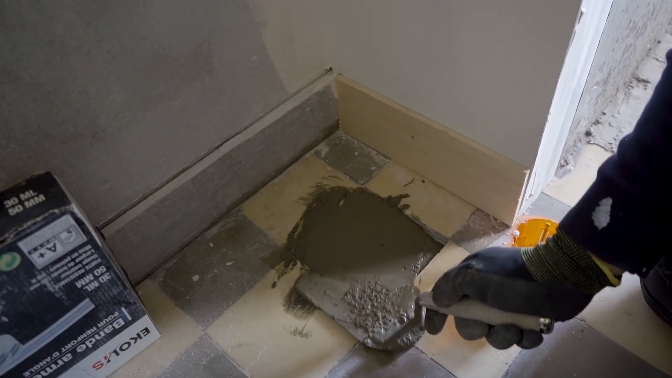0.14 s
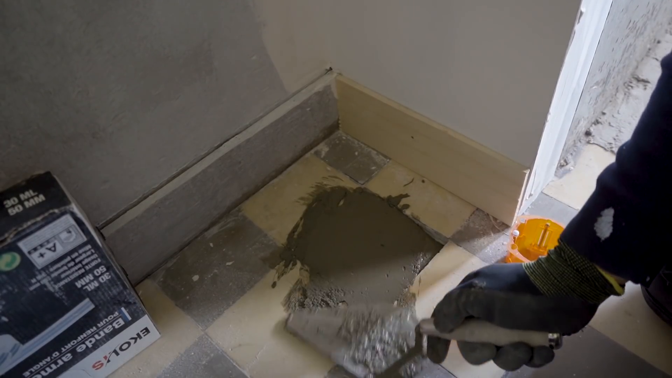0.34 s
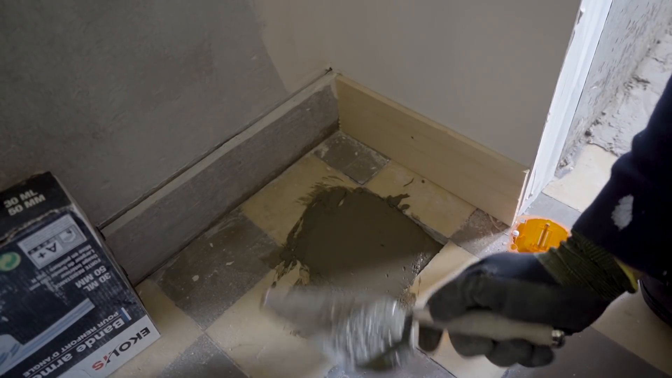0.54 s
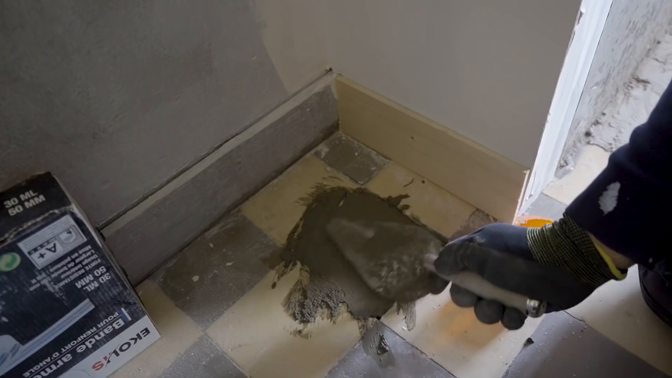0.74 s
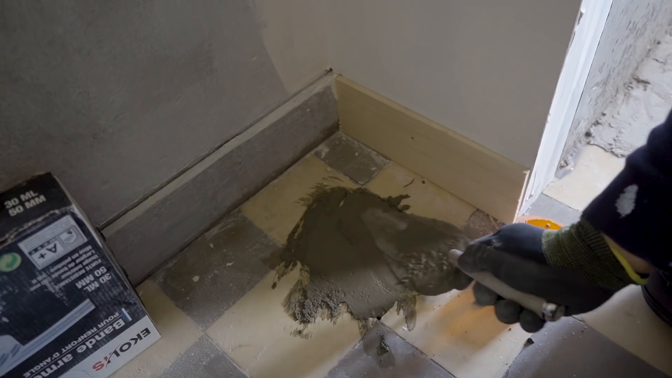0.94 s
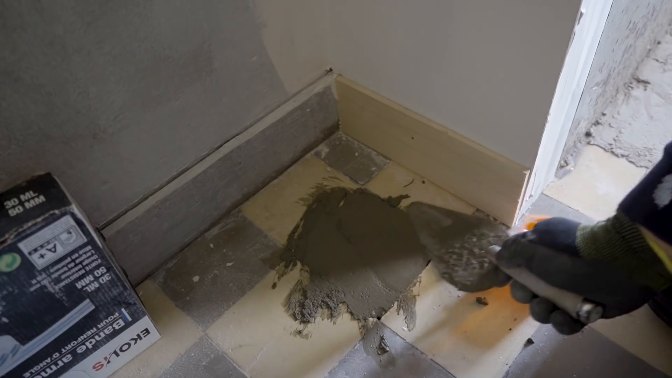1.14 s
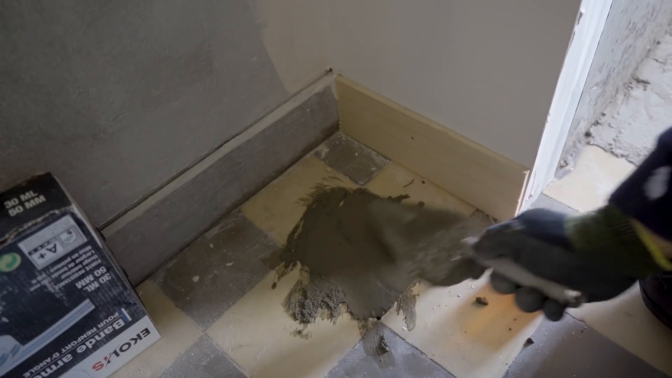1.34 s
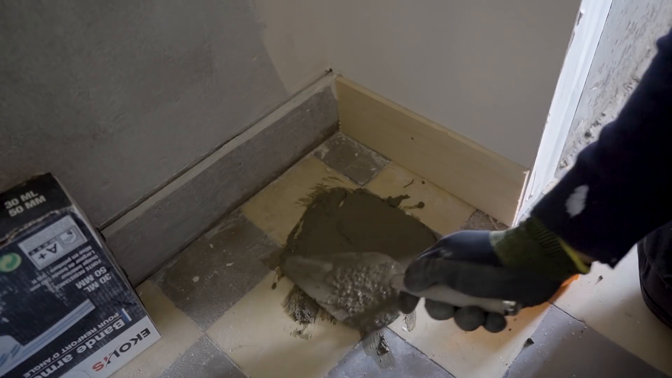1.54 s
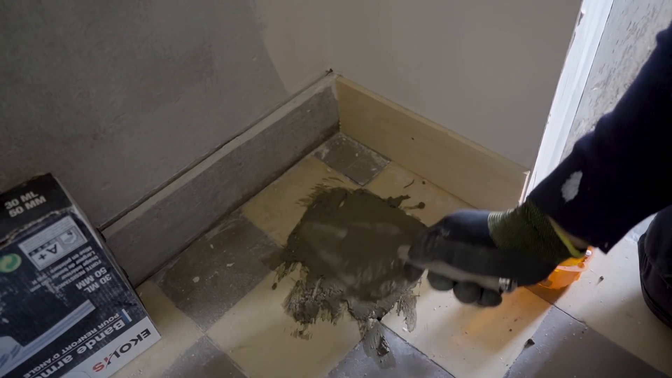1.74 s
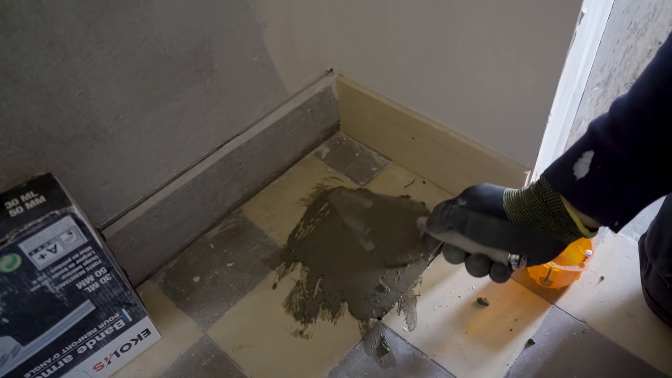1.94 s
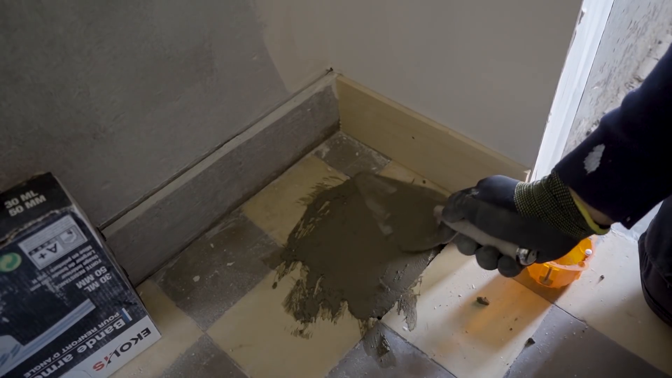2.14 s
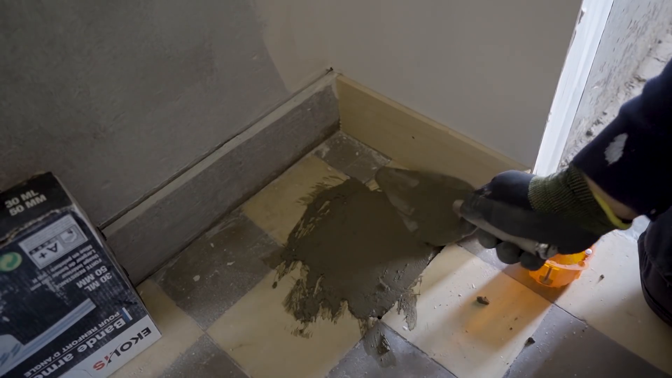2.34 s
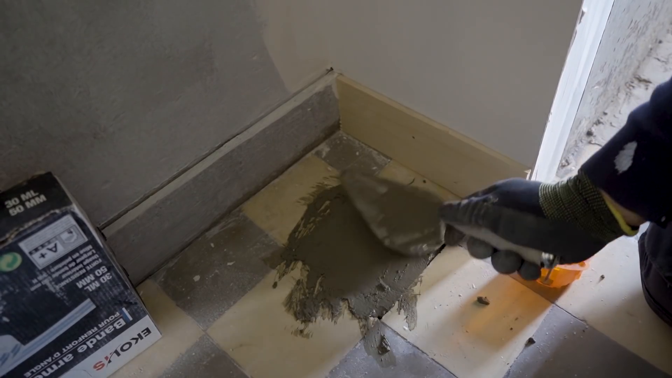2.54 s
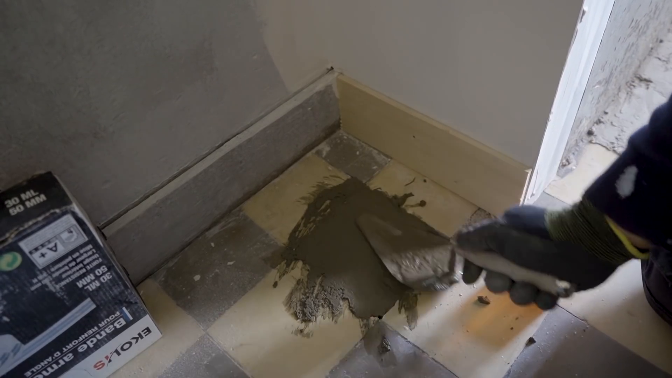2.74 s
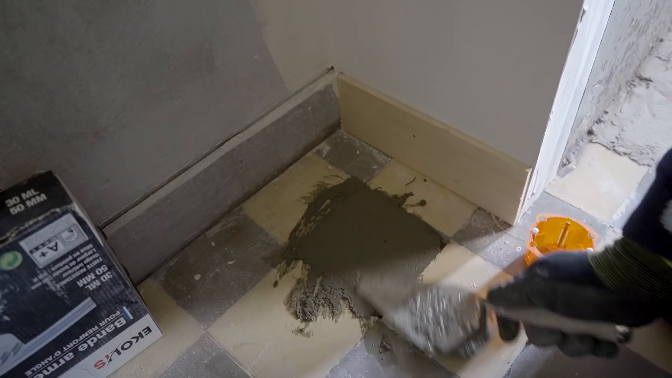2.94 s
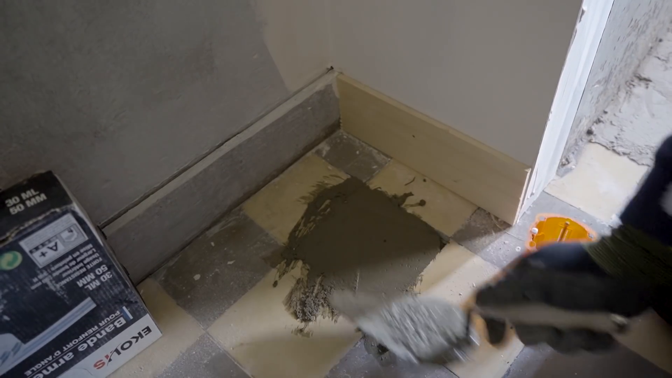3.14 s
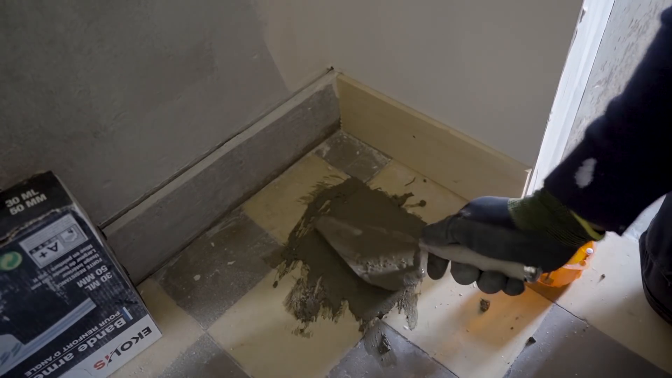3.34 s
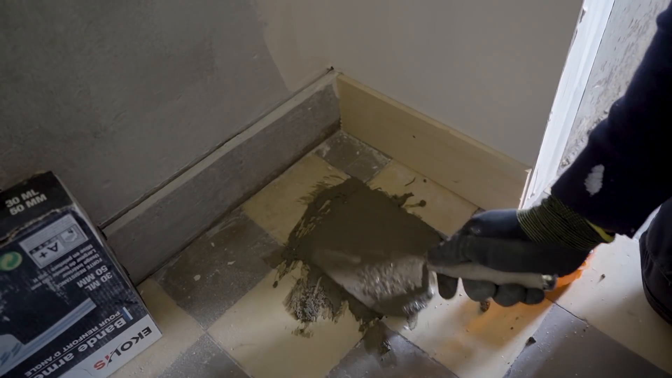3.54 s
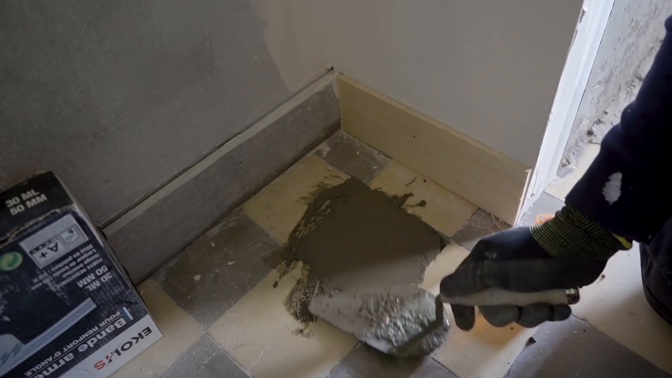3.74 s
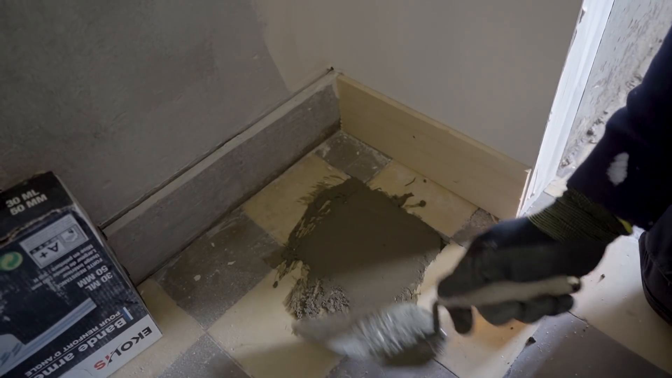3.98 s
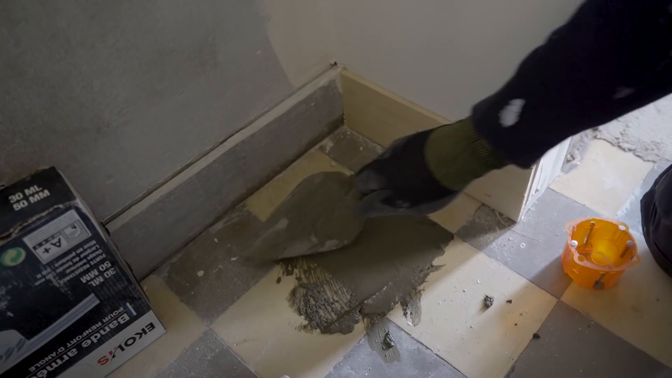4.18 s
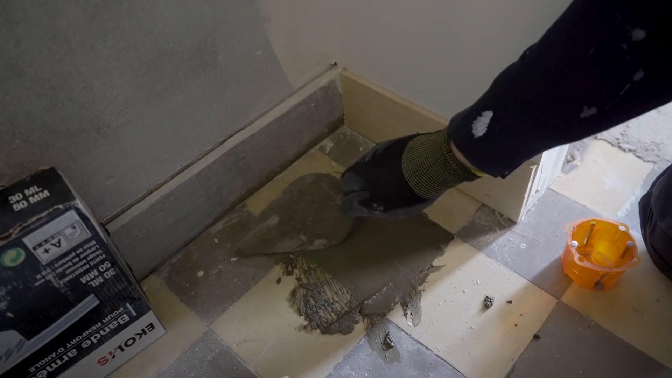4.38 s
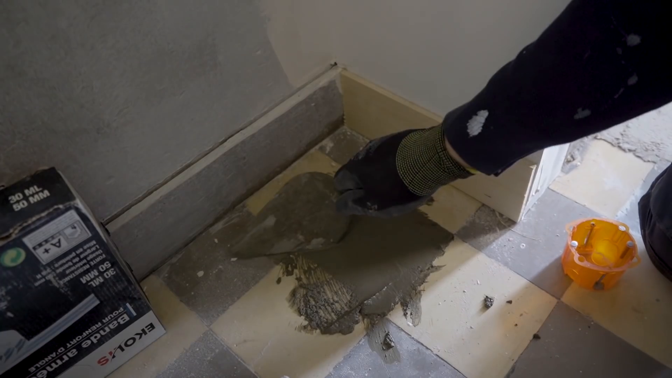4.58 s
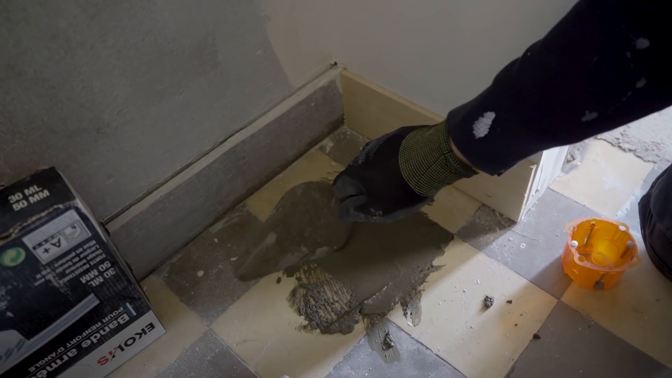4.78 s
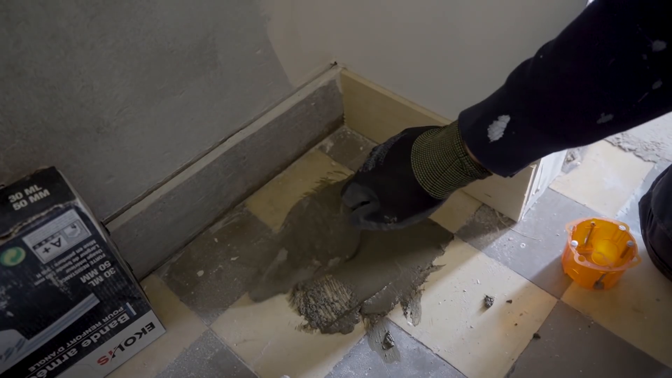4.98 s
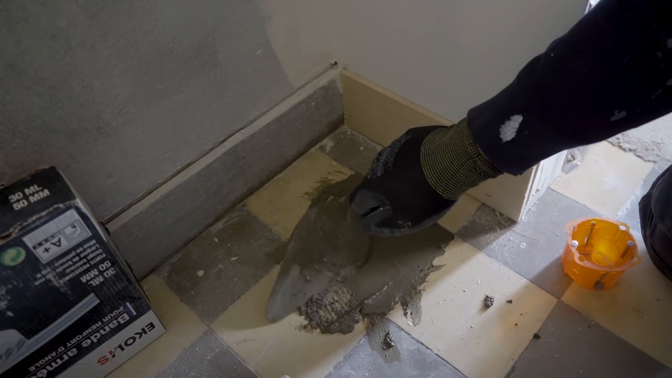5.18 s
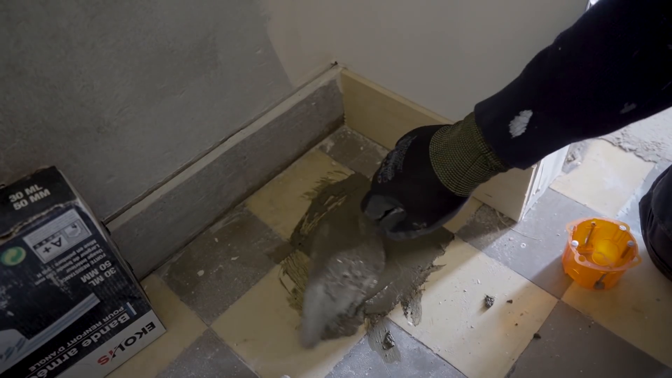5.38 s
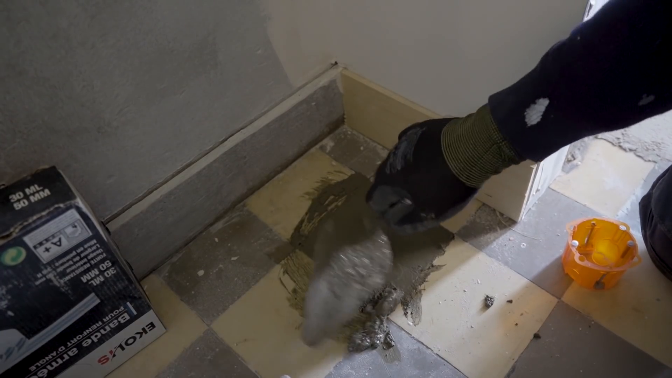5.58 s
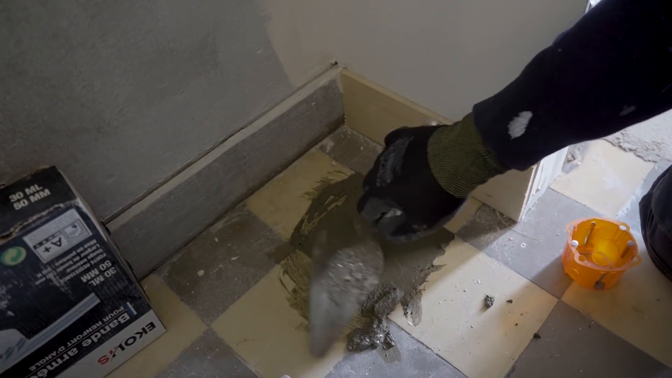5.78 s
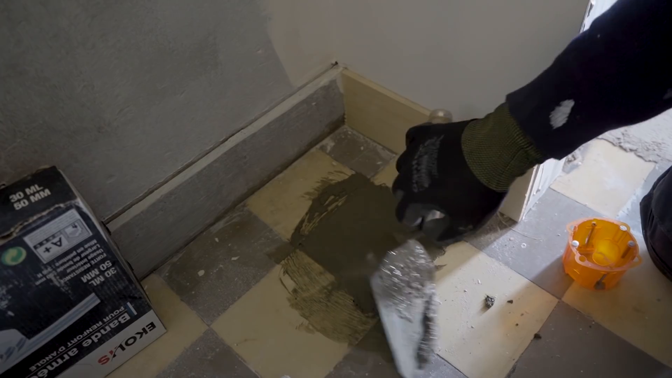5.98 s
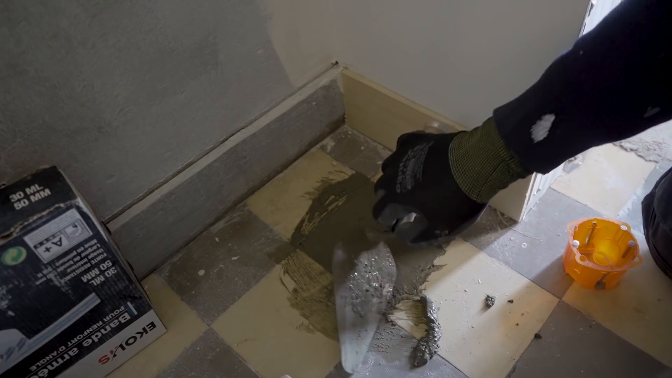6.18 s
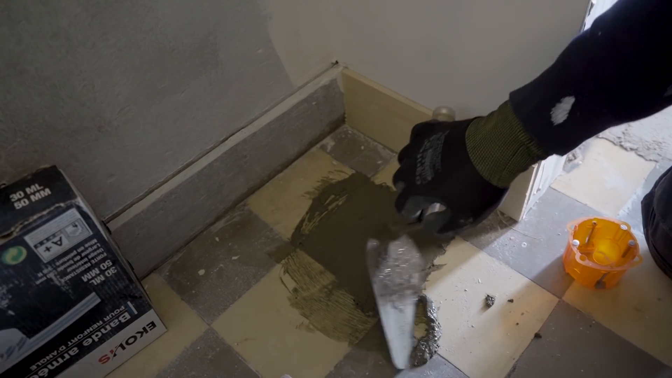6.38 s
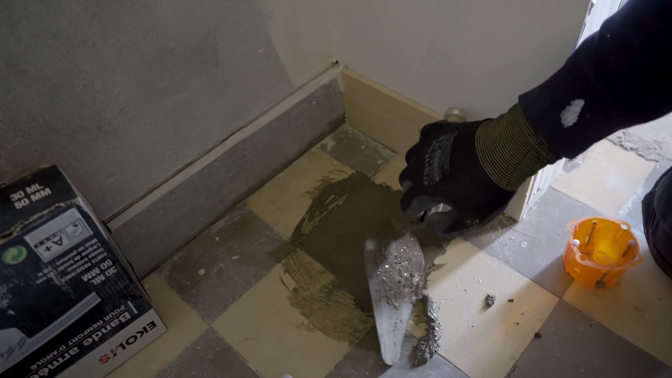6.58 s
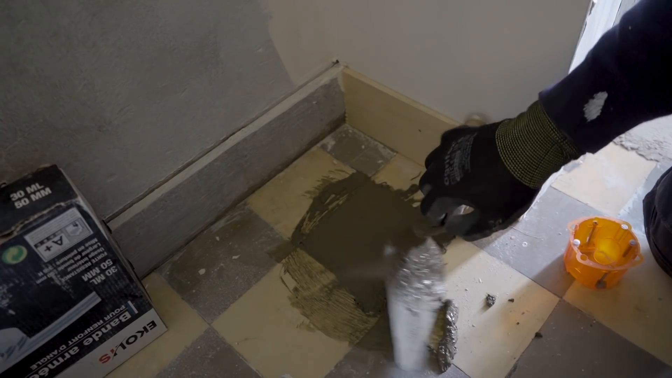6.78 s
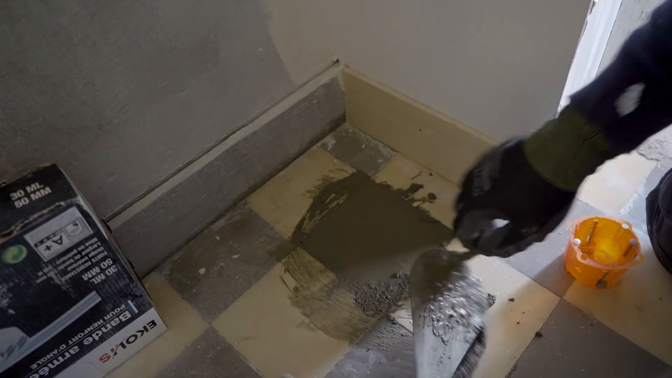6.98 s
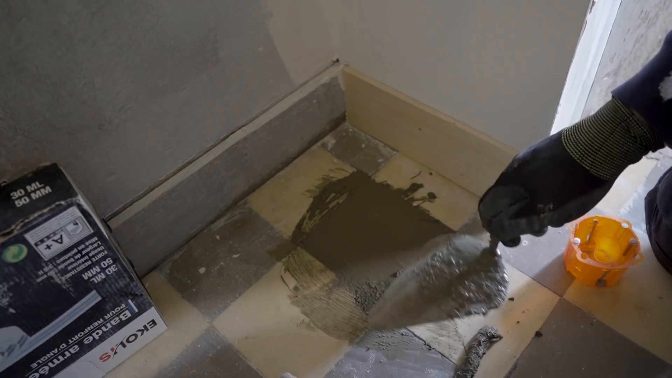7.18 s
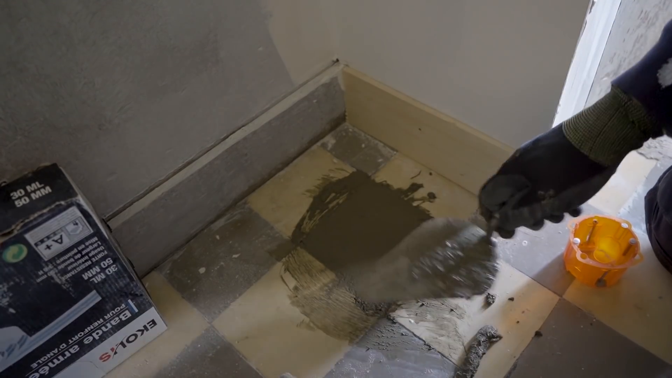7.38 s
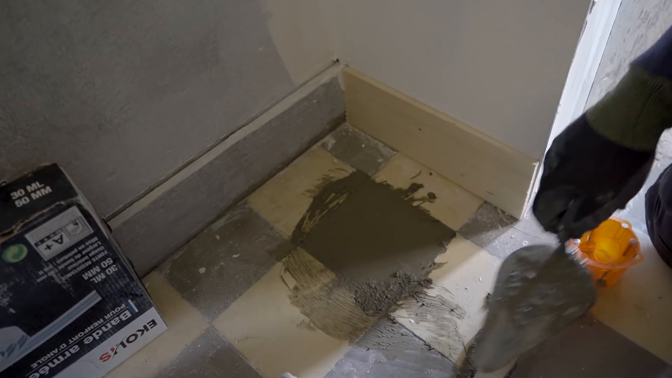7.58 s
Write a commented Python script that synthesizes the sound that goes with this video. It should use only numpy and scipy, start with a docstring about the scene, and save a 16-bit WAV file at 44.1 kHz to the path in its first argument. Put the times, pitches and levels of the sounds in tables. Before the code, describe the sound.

A steel trowel scrapes gritty wet concrete on a tiled floor in short rasping pulls, with metallic ticks and one dull hollow knock.

```python
"""Steel grinds over sand at once, in short pulls: a trowel smooths wet concrete over a hole in a tiled floor.
Each drag is random slips and grain clicks, filtered by steel, sand and floor; the ring follows the contact.
Taps are gritty impulses, pats are decaying floor modes, and squeals are wavering sines.
A double bump booms on the skirting board (decaying modes and noise); a sleeve rustles in filtered clicks.
The corner of a small bare room adds echoes, standing waves and a tail over shaped-noise air."""
import sys
import numpy as np
from scipy import signal
from scipy.io import wavfile
from scipy.ndimage import map_coordinates

SR = 44100
rng = np.random.default_rng(int(sys.argv[2]) if len(sys.argv) > 2 else 0)


def wrap_up_sound(samples):
    """Save the sound to the file named by the first command line argument, as 16-bit audio."""
    columns = np.atleast_2d(samples).T
    # keep every value between -1 and 1, then stretch to whole-number steps
    tamed = np.clip(columns, -1, 1)
    steps = np.round(tamed * 32767).astype(np.int16)
    wavfile.write(sys.argv[1], SR, steps)


N = 336037

# spectrum of the sand's fizz: f/Hz, relative level/dB
FIZZ = [(1800, -65), (3200, -7.5), (4200, 0.5), (5500, 0), (6800, -1.5), (7700, -2.5), (9000, -1.5),
        (11000, -6.5), (13000, -9), (15500, -14.5)]
# spectrum of the floor's thud, also used for the board's shudder: f/Hz, relative level/dB
THUD = [(30, -39.5), (62, -26), (88, -2.5), (110, -0.5), (150, 2.5), (200, -1.5), (270, 3), (350, -4),
        (520, -8.5), (800, -17.5), (2000, -88.5)]


def gain_of(db):
    """Level definition: an amplitude ratio is 10 to the power dB/20."""
    return 10 ** (np.asarray(db) / 20)


def evened(x):
    """Power normalisation: scales the signal to rms 1."""
    return x / np.sqrt(np.mean(x ** 2) + 1e-20)


def read(points, hz):
    """Logarithmic frequency scale: interpolates a table linearly in log f."""
    f, value = np.transpose(points)
    return np.interp(np.log(hz + 1), np.log(f + 1), value)


def add(mix, s, sound):
    """Superposition: sums a sound into the mix at time s."""
    part = mix[max(round(s * SR), 0):][:len(sound)]
    part += sound[:len(part)]


def colour(x, points, size=4096):
    """Minimum-phase filtering: a causal response of given spectrum keeps the sharp front of clicks."""
    hz = abs(np.fft.fftfreq(size, 1 / SR))
    log_gain = np.log(gain_of(read(points, hz)))
    spectrum = np.exp(np.conj(signal.hilbert(log_gain)))
    taps = np.fft.ifft(spectrum).real[:size // 2]
    return signal.fftconvolve(x, taps)[:len(x)]


def mode(x, hz, width):
    """Linear resonance: a fixed second-order peak of gain 1 and given bandwidth."""
    return signal.lfilter(*signal.iirpeak(hz, hz / width, fs=SR), x)


def resonate(x, hz, width):
    """Heterodyne resonance: shifts hz to zero, low-passes and shifts back, so hz may move."""
    turn = np.exp(2j * np.pi * np.cumsum(hz * np.ones(len(x))) / SR)
    r = np.exp(-np.pi * width / SR)
    return 2 * (turn * signal.lfilter([1 - r], [1, -r], x / turn)).real


def wander(t, per_s):
    """Band-limited fluctuation: a smooth random curve of about unit size through per_s points a second."""
    return map_coordinates(rng.standard_normal(4096), [t * per_s], order=2, mode="wrap")


def fades(t, length, attack, release):
    """Linear envelope: attack, hold and release, zero outside the length."""
    return np.clip(np.minimum(t / attack, (length - t) / release), 0, 1)


def grit(count, per_s, spread_db):
    """Shot noise: grain clicks of random time, sign and exponentially spread level in dB."""
    size = gain_of(spread_db * np.minimum(rng.exponential(1, count), 4))
    sign = rng.choice([-1, 1], count)
    return evened(size * sign * (rng.random(count) < per_s / SR))


def chatter(count, per_s, decay, depth):
    """Stick-slip friction: random jumps of the blade surge suddenly and die exponentially."""
    jumps = np.minimum(rng.exponential(.65, count), 1.6) * (rng.random(count) < per_s / SR)
    return 1 + depth * signal.lfilter([1], [1, -np.exp(-1 / (decay * SR))], jumps)


def pings(count, per_s, width, order=24):
    """Impulse response: coarse grains ring briefly at one of many pitches, per_s at each pitch."""
    pitches = np.linspace(2600, 13000, order) + rng.uniform(-200, 200, order)
    return evened(sum(mode(1. * (rng.random(count) < per_s / SR), f, width) for f in pitches))


def blade(force, hz, width, contact_db, overtone_db, direct_db):
    """Driven plate: steel answers with fixed resonances and a pair set by where it is held down."""
    # steady resonances of blade and handle: f/Hz, width/Hz, relative level/dB
    blade_modes = [(934, 64, 4), (1122, 160, 4), (1360, 18, 0.5), (1620, 16, -2), (1760, 50, -25),
                   (2290, 25, -18), (3006, 39.5, 5.5), (3690, 40, -5)]
    # spectrum of the blade's rasp: f/Hz, relative level/dB
    rasp_spectrum = [(250, -33.5), (480, -5), (720, -4), (1000, 0), (1900, -3), (3000, -4), (4000, -4.5),
                     (6000, -49), (9000, -46)]
    fixed = sum(gain_of(db) * mode(force, f, w) for f, w, db in blade_modes)
    overtone = resonate(force, 1.41 * hz, width)
    contact = resonate(force, hz, width) + gain_of(overtone_db) * overtone
    answer = fixed + gain_of(contact_db) * contact + gain_of(direct_db) * force
    return colour(answer, rasp_spectrum)


def stroke(start, length, rasp_db, swell_db, arch_db, fizz_db, rumble_db, edge_db, edge_hz, from_hz, to_hz):
    """Common friction source: one uneven drag under changing hand pressure drives steel, sand and floor."""
    t = np.arange(round(length * SR)) / SR
    way = t / length - .5  # -0.5 at the start, 0.5 at the end
    pressure_db = swell_db * way - arch_db * (2 * way) ** 2 + 0.71 * wander(t, per_s=27.4)
    unevenness = gain_of(1.08 * wander(t, per_s=130.35))
    slips = unevenness * chatter(len(t), per_s=90, decay=0.0042, depth=0.892)
    coarse = slips * grit(len(t), per_s=6000, spread_db=2.5)
    sand = slips * grit(len(t), per_s=7900, spread_db=1.0) + .5 * coarse
    # the point of contact slides along the blade; the hand rocks it, and its resonances shift together
    hz = np.linspace(from_hz, to_hz, len(t))
    rock = 1 + 0.051 * wander(t, per_s=39.53)
    rasp = blade(coarse, hz * rock, width=200, contact_db=21.0, overtone_db=-7.5, direct_db=-2.0)
    edge = resonate(resonate(sand, edge_hz * rock, 370), edge_hz, 1400)
    fizz = colour(sand + 0.71 * slips * pings(len(t), per_s=28, width=78), FIZZ)
    rumble = colour(coarse, THUD)
    # pressing harder makes the edge bite: extra dB of grating per dB of pressure
    bite_db = 0.61 * pressure_db
    parts = [(rasp, -.3), (edge, edge_db - 5.5 + bite_db),
             (fizz, fizz_db - .3), (rumble, rumble_db - 1.5)]
    # the blade settles into the mortar and lifts out again
    contact = fades(t, length, attack=0.015, release=.018)
    return start, contact * sum(gain_of(rasp_db + pressure_db + db) * evened(x) for x, db in parts)


def steel_ring(work):
    """Lightly damped free vibration: narrow modes let the steel ring on faintly after it is lifted."""
    # free modes of the steel: f/Hz, width/Hz, relative level/dB
    steel_modes = [(1540, 4.4, -9), (1620, 3.8, -3), (1750, 3.7, -22), (1800, 2.7, -16), (2290, 9.7, -9),
                   (3230, 7.6, -36)]
    return sum(gain_of(db + 2.0) * mode(work, f, w) for f, w, db in steel_modes)


def room(x, count=9):
    """Room acoustics: quick echoes and standing waves of the near corner, and a tail from bare walls."""
    # reverberation of the room: f/Hz, t60/s
    room_decay = [(100, 0.36), (400, 1), (1000, 0.76), (1700, 0.64), (2800, 0.69), (7000, 0.51),
                  (14000, 0.25)]
    # standing waves of the corner: f/Hz, width/Hz, relative level/dB
    corner_modes = [(79, 2.46, -13), (108.04, 4.9, -2), (261.6, 6.4, 1.5), (285, 4.8, -3)]
    hz, t, z = signal.stft(rng.standard_normal(SR), SR, nperseg=256)
    decay = gain_of(-60 * t / read(room_decay, hz)[:, None])
    tail = signal.istft(z * decay, SR, nperseg=256)[1]
    tail = tail * (1 - np.exp(-np.arange(len(tail)) / SR / 0.0037))
    echo = gain_of(-13.5) * tail / np.linalg.norm(tail)
    delay = rng.uniform(.002, 0.015, count)  # s
    early = gain_of(-15) * np.exp(-delay / 0.014) * rng.choice([-1, 1], count)
    echo[(delay * SR).astype(int)] += early
    standing = sum(gain_of(db - 4.5) * mode(x, f, w) for f, w, db in corner_modes)
    return x + standing + signal.fftconvolve(x, echo)[:N]


def room_air():
    """Stationary noise: still room air as white noise shaped by a fixed spectrum."""
    # spectrum of the room air: f/Hz, relative level/dB
    air_spectrum = [(20, 8), (33, -1), (45, 10.5), (60, 8), (120, -9), (260, -3.5), (600, -7.5),
                    (1500, -5.5), (4000, -14.5), (10000, -20.5), (15500, -24.5)]
    return gain_of(-64.5) * evened(colour(rng.standard_normal(N), air_spectrum))


def tap(s, ring_db, hz, thud_db, fizz_db, decay, count=6000, size=400):
    """Impact excitation: a blow cushioned by mortar, then a brief crunch as the sand gives way."""
    t = np.arange(count) / SR
    press = np.exp(-t / decay) * (1 - np.exp(-t / 0.0012))
    crunch = press * grit(count, per_s=12000, spread_db=1.5)
    force = crunch + 5 * (np.arange(count) == round(.0012 * SR))
    ring = blade(force, hz, width=155, contact_db=26, overtone_db=-10, direct_db=2.5)
    thud = colour(force, THUD)
    fizz = colour(crunch + 2.0 * press * pings(count, per_s=210, width=280), FIZZ)
    parts = [(ring, -9), (thud, thud_db - 11.5), (fizz, fizz_db - 10.5)]
    # each part is levelled by the spread of its first samples
    return s, sum(gain_of(ring_db + db) * x / x[:size].std() for x, db in parts)


def ringing(modes, rise):
    """Modal superposition: decaying sines of a heavy body that takes a moment to move, at peak 1."""
    t = np.arange(SR) / SR
    sound = 0
    for k, (f, db, t60) in enumerate(modes):
        sound = sound + (-1) ** k * gain_of(db - 60 * t / t60) * np.sin(2 * np.pi * f * t)
    sound = sound * (1 - np.exp(-t / rise))
    return sound / abs(sound).max()


def knock(s, boom_db, clack_db):
    """Modal impact: a blunt blow booms the hollow board under a wooden clack and a loose shudder."""
    # modes of skirting board and wall: f/Hz, relative level/dB, t60/s
    board_modes = [(81.3, -4.5, 0.75), (101, -18, 0.83), (128, 1, 0.17), (149, 4.5, 0.354), (174, -6, 0.75),
                   (208.5, -4.5, 0.505), (248, 4, 0.32), (279.6, -8, 0.81), (393, -7, .5),
                   (462, -9.5, 0.34), (544, -21, 0.35), (592, -8.5, 0.24), (672, -20, 0.35)]
    # spectrum of the board's clack: f/Hz, relative level/dB
    clack_spectrum = [(100, -53), (350, 2.5), (580, 6), (760, -9.5), (950, 0), (1500, -6.5), (3000, -16.5),
                      (8000, -37.5)]
    t = np.arange(SR) / SR
    rattle = rng.standard_normal(SR) * (np.exp(-t / 0.0022) + 0.26 * np.exp(-t / 0.061))
    clack = colour(rattle + 14 * (t == 0), clack_spectrum)
    shudder = evened(colour(rng.standard_normal(SR), THUD))
    shudder = shudder * np.exp(-t / 0.1116) * (1 - np.exp(-t / 0.012))
    boom = ringing(board_modes, rise=0.0076) + gain_of(-19.0) * shudder
    return s, gain_of(boom_db) * boom + gain_of(clack_db + 1) * clack / abs(clack).max()


def squeal(start, length, hz, db):
    """Friction-locked bending mode: an unsteady, nearly pure tone that builds and lets go."""
    t = np.arange(round(length * SR)) / SR
    turns = np.cumsum(hz * (1 + 0.011 * wander(t, per_s=270))) / SR
    build_db = np.interp(t / length, [0, 0.55, 1], [-15, 0, -15])
    level = gain_of(db + build_db + 1.9 * wander(t, per_s=61))
    tone = np.sqrt(2) * np.sin(2 * np.pi * turns)
    return start, level * tone * signal.windows.tukey(len(t), .1)


def sleeve_rustle():
    """Modulated shot noise: cloth clicks swell softly as the arm shifts its grip."""
    # movements of the sleeve: start t/s, length t/s, nominal level/dB
    rustles = [(4.112, 0.52, -57.5), (6.68, 0.5, -68), (7.203, 0.1, -61), (7.342, 0.13, -63)]
    # spectrum of the sleeve: f/Hz, relative level/dB
    sleeve_spectrum = [(30, -41), (90, -11.5), (170, 1.5), (330, 5), (560, 1), (900, -5.5), (1700, -7.5),
                       (3000, -8.5), (8000, -17.5), (15000, -38)]
    t = np.arange(N) / SR
    cloth = evened(colour(grit(N, per_s=3000, spread_db=-2.5), sleeve_spectrum))
    motion = sum(gain_of(db) * fades(t - s, length, attack=.09, release=.09) for s, length, db in rustles)
    return cloth * motion * gain_of(2.0 * wander(t, per_s=45))


def pat(s, thump_db):
    """Modal impact: the blade pressed flat sets the tiled floor's damped modes thumping."""
    # modes of the tiled floor: f/Hz, relative level/dB, t60/s
    floor_modes = [(81, -15, 0.42), (113.2, 3, 0.122), (149, 0.5, 0.12), (203, -5, 0.16), (265.26, -3, 0.2),
                   (312, -16, 0.23)]
    return s, gain_of(thump_db) * ringing(floor_modes, rise=0.0019)


def scene():
    """Superposition: strokes, taps, squeals, pats and knocks share one room, over air and sleeve."""
    # pulls of the blade: start t/s, length t/s, nominal rasp level at the middle/dB,
    # swell from start to end/dB, drop at both ends/dB, then nominal levels re rasp of
    # sand fizz/dB, floor rumble/dB, edge grating/dB; nominal edge resonance f/Hz,
    # nominal blade resonance at start f/Hz, at end f/Hz
    strokes = [ (0.0, 0.14, -41, -0.5, 7.5, -13.5, -12, -11, 2290, 1340, 1440),
               (0.115, 0.16, -37, 5, 15.5, -17.5, -16.5, -15, 2180, 1380, 1340),
               (0.294, 0.167, -38, 20, 1.5, -7, -19, -6, 2380, 1450, 1740),
               (0.448, 0.047, -33.5, -8, 4, -6.5, -18, -9, 2600, 1820, 1800),
               (0.887, 0.14, -48.5, 4, -6, -4.5, -7, 0.5, 2760, 1533, 1800),
               (1.017, 0.26, -36.5, 1.5, 4.5, -9.5, -14, -4, 2530, 1370, 1510),
               (1.654, 0.23, -35.5, 0.5, 8, -4.5, -14.5, 2.5, 2830, 1600, 1810),
               (1.86, 0.2, -43.5, -2.5, 0, -6, -18, 2, 2500, 1800, 1570),
               (2.055, 0.16, -48, -1, -2.5, -5, -10, 1.5, 2750, 1747, 1600),
               (2.179, 0.22, -38.5, 2.5, 7.5, -10, -25, -3, 2450, 1520, 1400),
               (2.799, 0.09, -51.5, -1, -7, -3, -9, 2.5, 2670, 1620, 1720),
               (2.868, 0.24, -36, 2.5, 3.5, -6, -12, -3.5, 2720, 1780, 1665),
               (3.466, 0.097, -47, 3, 0.5, -1, -8, 0.5, 2530, 1490, 1480),
               (3.583, 0.14, -46.5, 11.5, -1, -5, -4.5, 5, 2230, 1470, 1860),
               (3.715, 0.28, -38.5, -1, 3, -3.5, -10, 1, 2520, 1760, 1680),
               (4.416, 0.054, -40, -3, 2, -19, -6.5, -15, 2480, 930, 910),
               (4.666, 0.27, -39.5, 2.5, 6, -17, -10, -15, 2590, 890, 940),
               (4.92, 0.29, -39, 0.5, 1, -14.5, -16, -10, 2570, 940, 966),
               (5.192, 0.18, -45.5, 9.5, -3.5, -13, -7, -16, 2440, 1620, 1392),
               (5.372, 0.182, -35.5, 1, 8.5, -10, -11, -6, 2250, 1600, 1520),
               (5.54, 0.062, -38.5, 1, 2, -13, -10.5, 0, 3050, 1460, 1387),
               (5.835, 0.1588, -39, 4.5, 2, -10, -7, -2.5, 2670, 1620, 1550),
               (5.974, 0.12, -39.5, 1.5, 3.5, -7.5, -7, 1, 2390, 1540, 1560),
               (6.328, 0.15, -39, -6.5, 1.5, -13, -1.5, -6, 2550, 1474, 1340),
               (6.645, 0.076, -45.5, -4, -10, -12, -4, -5, 2636, 1220, 1290),
               (6.703, 0.11, -38, 1.5, 5.5, -10, -13.5, -1, 2400, 1265, 1386),
               (6.94, 0.043, -38.5, -6, -6, -11, -6, -16, 2600, 1310, 1320),
               (7.57, 0.078, -57.5, 20, -2, -6.5, 1, -2.5, 2500, 1250, 1170), ]
    # blade landing or catching a stone: t/s, nominal ring level/dB, blade resonance f/Hz,
    # nominal thud level re ring/dB, nominal fizz level re ring/dB, crunch decay t/s
    taps = [(0.255, -33, 1570, -5, -6.5, 0.026), (0.417, -21, 1900, -38.5, -20, 0.0097),
            (0.888, -33.5, 1800, -11, -3.5, 0.0054), (0.953, -31, 1940, -30, -10, 0.012),
            (1.314, -27.5, 1660, -11, -5, 0.01), (1.616, -48, 1280, -12, -26, 0.0036),
            (1.64, -49, 915, 4, 7, 0.0031), (1.656, -34, 1590, -4, 0.5, 0.0039),
            (2.074, -33, 1790, -26, -22, 0.006), (2.808, -35, 1150, -11, 0, 0.0059),
            (2.869, -31.5, 1900, -24.5, -2.5, 0.0036), (3.009, -29, 1760, -24, 1.5, 0.0074),
            (3.063, -26, 1650, -2, 1, 0.0025), (3.461, -28.5, 1070, -12, -3, 0.011),
            (3.507, -34, 1970, -10.5, -7.5, 0.0095), (3.923, -23.5, 1620, -19, -4, 0.0032),
            (4.406, -21, 1000, -5, -11, 0.0045), (4.625, -22.5, 924, -12.5, -18.5, 0.0089),
            (5.826, -18, 1620, -8.5, -11, 0.0097), (6.278, -29, 1383, -5, -11, 0.011),
            (6.401, -27.5, 1680, -13, -10, 0.0053), (6.437, -31.5, 1650, 6.5, -6.5, 0.0028),
            (6.639, -25.5, 1230, -2.5, -15.5, 0.0083), (6.719, -27.5, 1620, -13, -30, 0.0039),
            (6.931, -22, 1021, -3.5, -13, 0.0033)]
    # blade held by its tip alone: start t/s, length t/s, mean pitch f/Hz, nominal peak level/dB
    squeals = [(2.983, 0.011, 1755, -22.5), (2.993, 0.108, 1650, -32.5), (5.824, 0.036, 1610, -30),
               (5.861, 0.055, 1610, -38.5), (5.909, 0.049, 1610, -28.5)]
    # blade pressed flat on the floor: t/s, thump level/dB
    pats = [(6.279, -26), (6.345, -35), (6.388, -36), (6.436, -28), (6.93, -27.5)]
    # blows on the skirting board: t/s, nominal boom level/dB, nominal clack level/dB
    knocks = [(2.347, -16, -17), (2.447, -30, -30)]
    work = np.zeros(N)
    for row in strokes:
        add(work, *stroke(*row))
    for row in taps:
        add(work, *tap(*row))
    work = work + steel_ring(work)
    for row in squeals:
        add(work, *squeal(*row))
    for row in pats:
        add(work, *pat(*row))
    for row in knocks:
        add(work, *knock(*row))
    return (room(work) + room_air() + sleeve_rustle())[None]


def record(dry):
    """Band limitation: a linear-phase low-pass removes the sound above its edge."""
    edge_hz = 15750
    lowpass = signal.firwin(511, edge_hz, window=("kaiser", 9), fs=SR)
    return signal.oaconvolve(dry, lowpass[None], "same")


dry = scene()
out = record(dry)
wrap_up_sound(out)
```